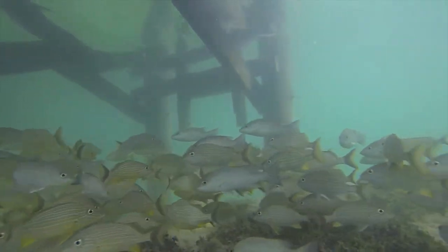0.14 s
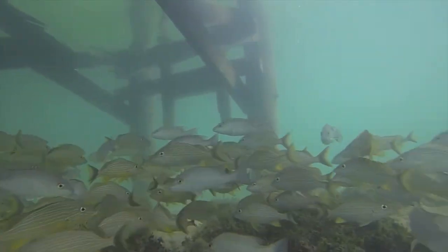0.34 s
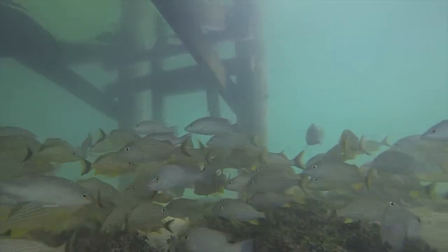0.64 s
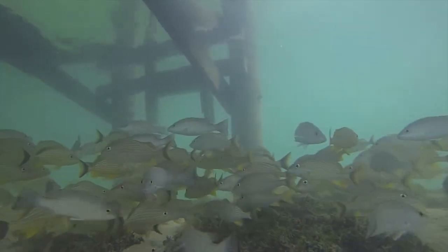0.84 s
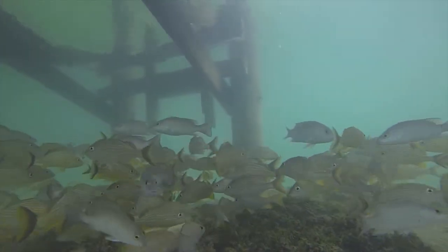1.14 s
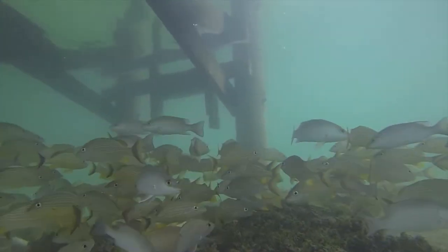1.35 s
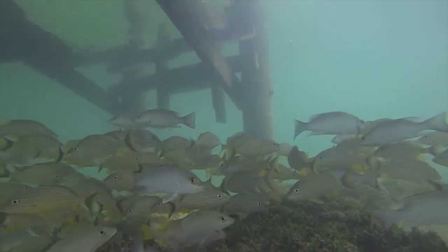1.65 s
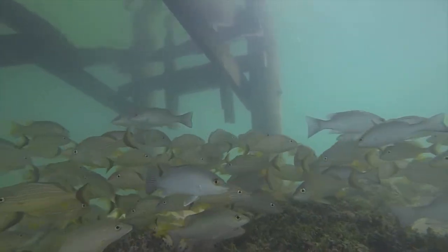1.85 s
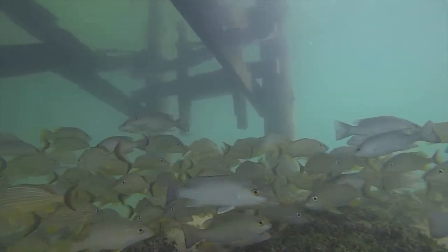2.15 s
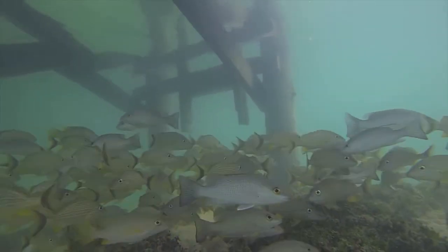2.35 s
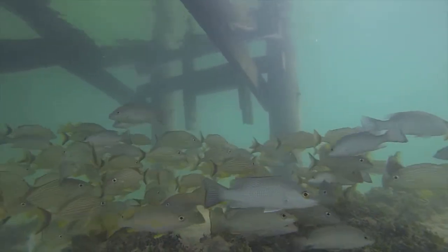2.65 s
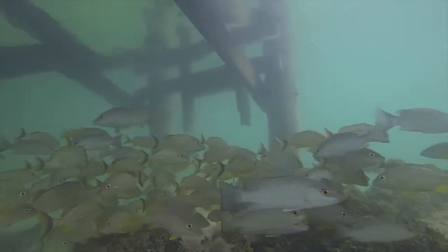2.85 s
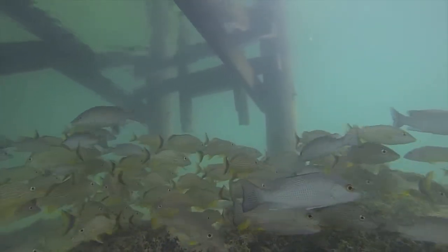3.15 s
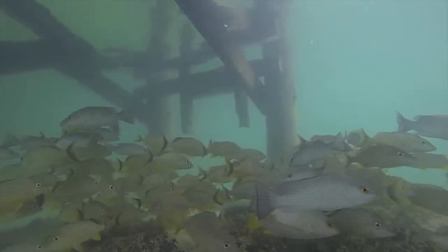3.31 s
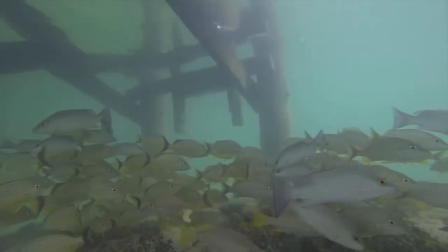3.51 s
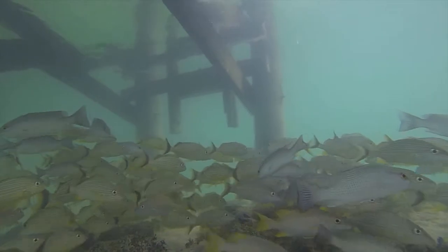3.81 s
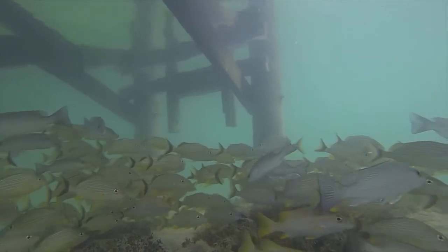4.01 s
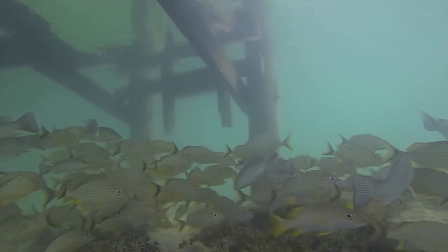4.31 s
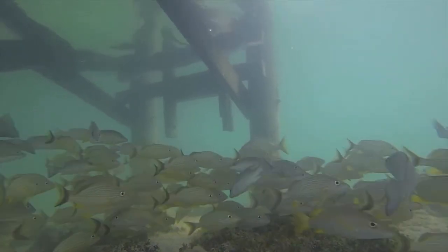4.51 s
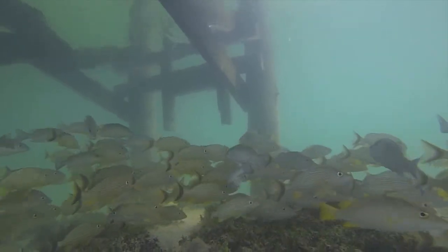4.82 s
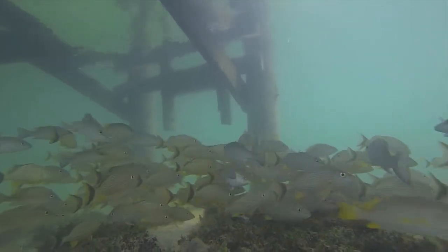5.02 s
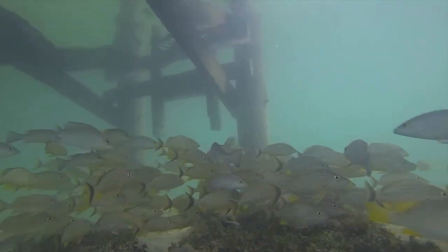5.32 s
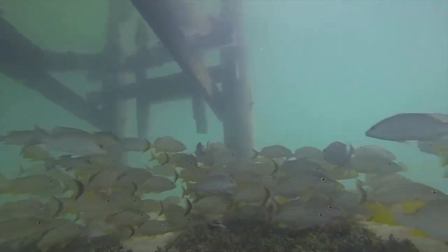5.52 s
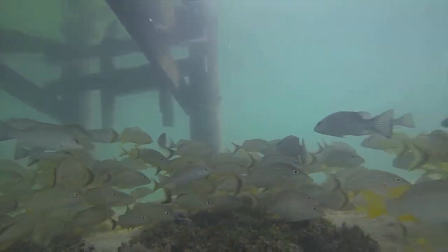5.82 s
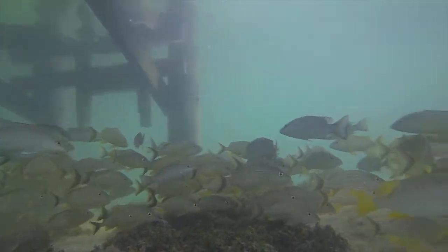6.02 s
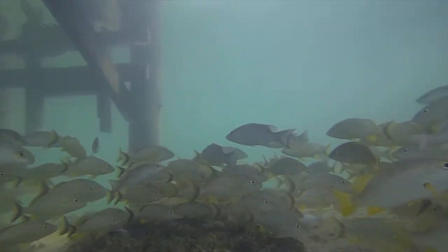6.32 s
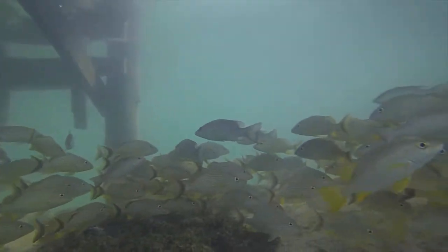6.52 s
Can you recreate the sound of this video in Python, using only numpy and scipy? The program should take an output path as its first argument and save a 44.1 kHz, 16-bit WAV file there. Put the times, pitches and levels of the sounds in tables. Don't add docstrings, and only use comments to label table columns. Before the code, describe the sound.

Underwater beneath a dock, with a muffled, resonant plastic-housing sound. From the start a motorboat approaches quickly: bubbly propeller roar and low growl swell to a peak at about 1.0 s while a faint gear whine climbs, then both sink away by 1.8 s. A low water surge brushes the microphone near 1.4 s. A very loud hard click cracks at 1.9 s, a quick scraping run follows at 2.16 s, and more ticks scatter to 3.5 s, strongest at 3.09 s. Meanwhile slow soft engine thumps, a distant drone and a low steady hum, stronger after 2.6 s, continue. Another tick lands at 4.1 s. A second, farther boat rises from 4.4 s, its nasal whine peaking near 4.8 s among sharp clicks at 4.72 and 4.88 s, then falling until 5.85 s. Midrange wash, hum and sparse ticks remain to 6.6 s, over constant thin hiss and rapid high electronic chirping.

```python
import sys
import numpy as np
from scipy import signal
from scipy.fft import rfft, irfft, next_fast_len
from scipy.io import wavfile
from scipy.ndimage import uniform_filter1d, map_coordinates

SR = 44100
rng = np.random.default_rng(int(sys.argv[2]) if len(sys.argv) > 2 else 0)


def voltage_ratio(decibels):
    exponent = np.asarray(decibels, float) / 20
    return 10 ** exponent


def file_out(sig):
    cols = np.atleast_2d(sig).T
    lim = np.clip(cols, -1, 1)
    pcm = np.round(lim * 32767).astype(np.int16)
    wavfile.write(sys.argv[1], SR, pcm)


N = 293706
T = np.arange(N) / SR


def unit(x):
    return x / np.sqrt(np.mean(x ** 2) + 1e-20)


def along(points, hz):
    f, v = np.transpose(points)
    return np.interp(np.log(hz + 1), np.log(f + 1), v)


def curves(rows, t=T):
    s, *cols = np.transpose(rows)
    return [np.interp(t, s, c) for c in cols]


def wobble(rate_hz):
    knots = rng.standard_normal(int(N * rate_hz / SR) + 4)
    return map_coordinates(knots, [T * rate_hz])


def phase(hz):
    return 2 * np.pi * np.cumsum(hz) / SR


def during(rows, fade_s):
    inside_s = np.minimum(T - rows[0][0], rows[-1][0] - T)
    return np.clip(inside_s / fade_s, 0, 1)


def filtered(x, response):
    m = next_fast_len(N + SR // 2)
    return irfft(rfft(x, m) * response(np.fft.rfftfreq(m, 1 / SR)), m)[:N]


def noise_with(spectrum):
    return unit(filtered(rng.standard_normal(N), lambda f: voltage_ratio(along(spectrum, f))))


def patches(shape, frames):
    field = uniform_filter1d(rng.standard_normal(shape), size=8, axis=0)
    return uniform_filter1d(field, size=frames, axis=1)


def notch(f, hz, narrow_hz, wide_hz):
    off = hz * hz - f * f
    return (off + 1j * f * narrow_hz) / (off + 1j * f * wide_hz)


# centre_hz, width_hz, level_db
HOUSING_MODES = [(188, 75, -10), (421, 85, -8.5), (600, 59, -3.5), (1028, 92, -5), (1403, 148, -9),
                 (1676, 256, -5.5), (2008, 119, -3), (2628, 261, -9), (3371, 252, -7), (4185, 426, -18),
                 (5190, 720, -23), (7450, 1300, -33.5)]


def housing(f):
    total = 0
    for k, (centre, width, db) in enumerate(HOUSING_MODES):
        loss = 1j * f * width
        total = total + (-1) ** k * voltage_ratio(db) * loss / (centre * centre - f * f + loss)
    return total * notch(f, 3870, 116, 405)


def rush(spectrum, patchy_db, shape=lambda hz, t: 1):
    hz, t, z = signal.stft(rng.standard_normal(N), SR, nperseg=1024)
    z = z * voltage_ratio(patchy_db * unit(patches(z.shape, 5))) * shape(hz[:, None] + 1, t)
    x = signal.istft(z, SR, nperseg=1024)[1][:N]
    return filtered(x, lambda f: voltage_ratio(along(spectrum, f)) * housing(f))


# time_s, distance [ratio to the closest]
NEAR_PATH = [
    (.2, 29),
    (.45, 6.7),
    (.6, 3.82),
    (.85, 2.27),
    (1.03, 1.12),
    (1.15, 1.89),
    (1.27, 3.08),
    (1.55, 8.1),
    (1.85, 31),
]
# freq_hz, level_db
ROAR_SPECTRUM = [(100, 1.5), (300, 5.5), (700, -1.5), (1200, -2), (2000, -8), (3500, -6.5), (6000, -7.5),
                 (7700, 0.5), (9000, 1), (10800, 8), (13000, 5), (15500, 1)]
ROAR_SPAN = [(-.3,), (2.3,)]


def near_boat():
    edge_hz, edge_top_hz = 110, 850
    growl_db, growl_reach, growl_loss_db = 5, 4.33, 30
    roar_db, spread_db = -32.5, 19
    dull_db = 0.18

    def channel(hz, t):
        far, = curves(NEAR_PATH, t)
        ratio = hz / np.minimum(edge_hz * far, edge_top_hz)
        bass_db = growl_db - growl_loss_db * np.clip(np.log2(far / growl_reach), 0, 1)
        growl = voltage_ratio(bass_db / (1 + (hz / 850) ** 4))
        dull = voltage_ratio(-dull_db * (far - 1) * hz / 10000)
        pile_up = voltage_ratio(2 * np.exp(-(np.log(ratio / 1.26) / 0.25) ** 2))
        return growl * dull * pile_up / np.sqrt(1 + ratio ** -12)

    blades = voltage_ratio(1.1 * wobble(25.47) + 1.53 * wobble(110))
    roar = blades * rush(ROAR_SPECTRUM, 1.8, channel)
    roar = filtered(roar, lambda f: notch(f, 880, 32, 160))
    distance, = curves(NEAR_PATH)
    return voltage_ratio(roar_db - spread_db * np.log10(distance)) * during(ROAR_SPAN, 0.25) * unit(roar)


# time_s, drone_db
FAR_TRAFFIC = [(0, -58.5), (.3, -59.5), (1.7, -55.5), (2.14, -58), (2.31, -50), (2.54, -49), (3.09, -52.5),
               (4.12, -52), (4.32, -49), (4.56, -47), (4.78, -40), (4.93, -44), (5.31, -42.5),
               (5.57, -44.5), (6.04, -45.5), (6.45, -45), (6.66, -45.5)]
# freq_hz, level_db
DRONE_SPECTRUM = [(800, -16), (1200, 1), (1500, -24), (1700, -6), (1850, 2.5), (2000, 4.5), (2130, 8.5),
                  (2350, 6.5), (2700, -4), (3000, -4), (3400, -22)]
RASP_SPECTRUM = [(2300, -36), (2800, -2.5), (3300, 4.5), (3700, -3.5), (4200, -32)]
FIZZ_SPECTRUM = [(3000, -44), (3900, -3), (5500, -4), (7000, -14), (9000, -2.5), (12000, -41)]
BODY_SPECTRUM = [(150, -33), (280, 3.5), (410, -3.5), (500, 0), (600, -4.5), (740, 6.5), (880, -8.5),
                 (1100, -11), (1400, -9)]


def far_boats():
    drone_db, = curves(FAR_TRAFFIC)
    second = 1 / (1 + ((T - 4.69) / 0.28) ** 2)
    swing_db = drone_db + 51
    rasp_db = -62 + 0.74 * swing_db + 6.2 * second
    fizz_db = -73.5 + 0.36 * swing_db + 8.5 * second
    body_db = -56.5 + 0.017 * swing_db + 4.4 * second
    swell_db = 0.79 * wobble(9)
    drone = voltage_ratio(drone_db + swell_db) * unit(rush(DRONE_SPECTRUM, 2.0))
    rasp = voltage_ratio(rasp_db + swell_db) * unit(rush(RASP_SPECTRUM, 0.73))
    fizz = voltage_ratio(fizz_db + swell_db) * unit(rush(FIZZ_SPECTRUM, 1.2))
    body = voltage_ratio(body_db + 1.15 * wobble(11)) * unit(rush(BODY_SPECTRUM, 2.6))
    return drone + rasp + fizz + body


def generator():
    load_s, load_db = 2.58, 7
    hum_db = -60.5 + load_db * np.clip((T - load_s) / 0.27 + .5, 0, 1)
    turn = 2 * np.pi * 119.8 * T + 0.46 * wobble(4.7)
    return voltage_ratio(hum_db + wobble(3.92)) * (np.sin(turn) + voltage_ratio(-10.5) * np.sin(2 * turn))


# freq_hz, level_db
SURGE_SPECTRUM = [(12, -46), (20, -1), (86, -6), (118, -7.5), (147, -14), (193, -6.5), (300, -20),
                  (390, -43), (660, -120)]
# time_s, rise_db
SURGE_SWELLS = [
    (.45, 4.1),
    (1.4, 7.9),
    (3.55, 4.2),
    (4.75, 3.3),
    (5.68, 4.6),
]


def surge():
    level_db, swell_s = -54.5, 0.11
    for s, db in SURGE_SWELLS:
        level_db = level_db + db * np.exp(-((T - s) / swell_s) ** 2)
    slosh = voltage_ratio(.8 * wobble(9))
    return voltage_ratio(level_db) * slosh * noise_with(SURGE_SPECTRUM)


# freq_hz, level_db
HISS_SPECTRUM = [(3900, -28), (6600, -13), (7000, -14.5), (9800, -18.5), (11500, -11.5), (12500, -12.5),
                 (13300, -10.5), (13800, -14), (15300, -16), (16000, -60)]
# pitch_hz, offset_in_burst_hz, level_db
CHIRP_TONES = [(12862.26, 14, -62), (6395.17, 24, -68)]


def camera():
    rate_hz, start, share = 47.905, .68, .4
    cycle = T * rate_hz - start + 1
    gate = 1. * (cycle % 1 < share)
    gate = uniform_filter1d(uniform_filter1d(gate, size=30), size=30)
    burst = cycle + .3
    late = 3 * np.pi / 5 * (burst // 2 % 2)
    tones = 0
    for hz, offset_hz, db in CHIRP_TONES:
        turns = hz * T + offset_hz * (burst % 1) / rate_hz
        tones = tones + voltage_ratio(db + 3.5) * np.sin(2 * np.pi * turns + late)
    return gate * tones + voltage_ratio(-73.5) * noise_with(HISS_SPECTRUM)


def through_wall(x):
    echo_s, echo_db = .0098, -20

    def response(f):
        wall = (1j * f / (420 + 1j * f) / (1 + 1j * f / 6000)) ** 2
        echo = voltage_ratio(echo_db) * f / (f + 4000) * np.exp(-2j * np.pi * f * echo_s)
        return wall * (1 + echo) / (1 + (f / 12500) ** 6)
    return filtered(x, response)


# time_s, peak_db, crack_db, rattle_db
TICK_HITS = [(0.0145, -32, -27.5, -13), (1.6935, -35.5, -13, -0.5), (1.8997, -3.5, -20.5, -6),
             (2.112, -40, -23, -16), (2.3729, -24, -16, -6), (2.5293, -28.5, -31, -12),
             (2.9283, -43, -26, 5), (3.0056, -32.5, -28, -24), (3.087, -8.5, -14, -6.5),
             (3.2078, -36.5, -21, 1), (3.2273, -22.5, -17, -3.5), (3.2366, -28, -14, -13),
             (4.8676, -29, -11, -5), (3.5183, -29, -14, -7), (4.0987, -11.5, -19.5, -10),
             (4.7206, -13.5, -15.5, -4.5), (4.8827, -3.5, -19.5, -6), (4.9063, -18, -13, -3.5),
             (5.2734, -11.5, -21, -9), (5.8794, -33.5, -30, 0), (6.1696, -47, -27, -1)]
# time_s, peak_db, ring_hz, crack_db,
# rattle_db
PRICK_HITS = [(1.3999, -42, 2760, -31, 13.5), (2.025, -58, 3270, -16, -6), (2.0734, -29.5, 3440, -11, 3.5),
              (3.7053, -55.5, 2940, 11, 25.5), (4.2363, -38.5, 3500, -6, 4.5), (5.1701, -25, 2710, -27, 0),
              (5.1935, -31, 2800, -20, -5), (5.6547, -39.5, 2660, -7, 5.5), (5.819, -40, 3470, -15, 7),
              (1.8995, -16.5, 3570, -30, -20), (3.0872, -14.5, 2500, -24, -20),
              (4.0987, -27, 2690, -30, -16), (4.883, -11.5, 2530, -32, -24), (3.0893, -17, 3440, -30, -20),
              (4.885, -19.5, 3440, -28, -16)]
# time_s, peak_db, ring_hz
SCRAPE_HITS = [
    (2.1575, -14, 2620),
    (2.166, -21.5, 2640),
    (2.177, -27, 3300),
    (2.1852, -29.5, 2640),
    (2.2069, -33.5, 2600),
]


def ticks():
    near, rattle, t = np.zeros(N + SR), np.zeros(N + SR), np.arange(SR // 5) / SR
    hits = []
    for s, db, crack_db, rattle_db in TICK_HITS:
        t60_s = 0.051 - 0.00063 * (db + 33)
        hits.append((s, db, 1767, crack_db, rattle_db, t60_s))
    hits += [row + (0.026,) for row in PRICK_HITS]
    hits += [row + (-22, -2, .072) for row in SCRAPE_HITS]
    chance = rng.standard_normal((len(hits), 2, len(t)))
    swell = (t / 0.0015 * np.exp(1 - t / .0016)) ** 3.4
    onset = 1 - np.exp(-(t / 0.00021) ** 2)
    snap = onset * (voltage_ratio(-60 * t / .007) + voltage_ratio(-17 - 60 * t / .035))
    for (s, db, hz, crack_db, rattle_db, t60_s), (a, b) in zip(hits, chance):
        at = round(s * SR)
        ring = voltage_ratio(-3.5) * swell * np.sin(2 * np.pi * hz * t)
        crack = voltage_ratio(crack_db + 7.5) * snap * np.diff(a, prepend=0)
        near[at:][:len(t)] += voltage_ratio(db) * (ring + crack)
        decay_db = -60 * t / max(t60_s, .005)
        rattle[at:][:len(t)] += voltage_ratio(db + rattle_db + 14.0 + decay_db) * onset * b
    return through_wall(near[:N]) + filtered(rattle[:N], lambda f: housing(f) * f / (f + 900))


# time_s, pitch_hz
ENGINE_SPEED = [(0, 1210), (.3, 1852), (1.03, 3165), (1.22, 2655), (1.45, 2118), (1.78, 1737), (2.25, 1247),
                (2.3, 1430), (2.8, 1352), (4.2, 1347), (4.6, 2050), (4.8, 2313), (5, 1996), (5.36, 1733),
                (5.75, 1535), (6.1, 1400), (6.66, 1370)]


def engine_thumps():
    mesh_per_thump = 208
    run_starts_s = (.158, 2.348, 7)
    speed_hz, = curves(ENGINE_SPEED)
    turns = np.cumsum(speed_hz) / SR / mesh_per_thump
    marks = np.interp(run_starts_s, T, turns)
    counts = np.concatenate([np.arange(a, b - .5) for a, b in zip(marks, marks[1:])])
    out, t = np.zeros(N + SR), np.arange(SR // 8) / SR
    for s, (a, b) in zip(np.interp(counts, turns, T), rng.standard_normal((99, 2))):
        doublings = np.log2(np.interp(s, T, speed_hz) / 1340)
        db = -44 + min(8 * doublings, 6.5) + 2.2 * a
        envelope = voltage_ratio(db - 60 * t / 0.065) * (1 - np.exp(-t / 0.0021))
        out[round(s * SR):][:len(t)] += envelope * np.sin(2 * np.pi * (198 + 7 * b) * t)
    return out[:N]


# pitch_hz, level_db
WHINE_RESPONSE = [(1500, -38), (1700, -16), (1850, -4), (2000, 1), (2300, -4), (2650, 3), (3150, -2)]
# start_s, end_s, level_db
WHINE_SPANS = [
    (.2, 1.8, -53),
    (4.4, 5.85, -41.5),
]


def gears():
    out, (speed_hz,) = 0, curves(ENGINE_SPEED)
    second_gear_db, reaches, breakups_db = (4, 5), (.72, .9), (3.2, 1.5)
    for (start, end, db), second_db, reach, broken_db in zip(WHINE_SPANS, second_gear_db, reaches, breakups_db):
        heard = during([(start,), (end,)], 0.097)
        close = np.clip((speed_hz / np.max(speed_hz * heard) - reach) / .06, 0, 1)
        for share, gain in ((1, 1), (.745, voltage_ratio(second_db) * close)):
            hz = share * speed_hz
            turn = phase(hz) + broken_db / 5 * wobble(50)
            level_db = db + along(WHINE_RESPONSE, hz) + 5 - 1.6 * broken_db + broken_db * wobble(22)
            out = out + voltage_ratio(level_db) * gain * heard * np.sin(turn)
    return out


# time_s, peak_db, pitch_hz
KNOCK_HITS = [(1.899, -1.5, 980), (2.156, -30, 600), (2.177, -25.5, 580), (2.372, -37, 670),
              (2.53, -40, 686), (3.087, -17, 695), (3.227, -31, 765), (3.52, -36, 990), (4.686, -27, 790),
              (4.721, -16.5, 696), (4.883, -9, 665), (4.906, -28, 690), (5.272, -24.5, 985)]


def knocks():
    out, t = np.zeros(N + SR), np.arange(SR // 5) / SR
    for s, db, hz in KNOCK_HITS:
        t60_s = max(0.008 - 0.00019 * db, .004)
        envelope = voltage_ratio(db + 8 - 60 * t / t60_s) * (1 - np.exp(-t / 0.0012))
        out[round(s * SR):][:len(t)] += envelope * np.sin(2 * np.pi * hz * t)
    return through_wall(out[:N])


# share [of engine speed], centre_hz, width_hz, level_db
SINGING_TONES = [(.755, 1035, 75, -56.5), (.46, 1050, 60, -54), (.345, 580, 55, -61)]


def far_singing():
    out, (speed_hz,) = 0, curves(ENGINE_SPEED)
    for share, centre_hz, width_hz, db in SINGING_TONES:
        hz = share * speed_hz
        turn = phase(hz)
        steady = (1.7 + .7 * wobble(60)) * np.cos(turn + .7 * wobble(30))
        tone = unit(steady + 1.1 * wobble(120) * np.sin(turn))
        out = out + voltage_ratio(db) * tone / (1 + ((hz - centre_hz) / width_hz) ** 4)
    return during([(2.27,), (9,)], 0.23) * out


def scene():
    boats = near_boat() + far_boats() + engine_thumps() + gears() + far_singing()
    return (boats + generator() + surge() + camera() + ticks() + knocks())[None]


def starved_top(x):
    hz, t, z = signal.stft(x, SR, nperseg=1024)
    bright = np.sum(abs(z[(hz > 7000) & (hz < 12000)]) ** 2, axis=0)
    need_db = (hz[:, None] - 12600) / 200
    loud = 10 * np.log10(bright / np.median(bright) + 1e-9) > need_db
    lucky = uniform_filter1d(rng.standard_normal(len(t)), size=4) > .4
    kept = (hz[:, None] < 13400) | loud | (lucky & (patches(z.shape, 3) > .06))
    return signal.istft(z * kept, SR, nperseg=1024)[1][:N]


def band_limit(x):
    return signal.sosfilt(signal.butter(12, 16400, fs=SR, output="sos"), x)


def record(dry):
    top = [(13500, 0), (15300, -3), (15600, -22), (17000, -70)]  # freq_hz, gain_db
    kept = filtered(dry[0], lambda f: voltage_ratio(along(top, f)))
    mix = starved_top(kept)[None]
    return band_limit(mix)


dry = scene()
out = record(dry)
file_out(out)
```